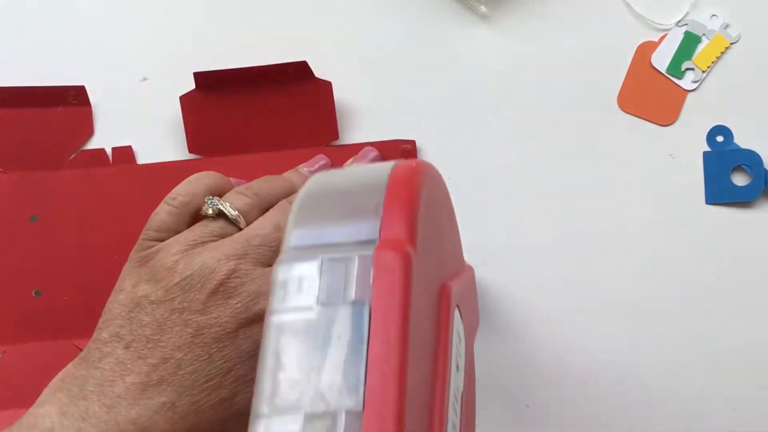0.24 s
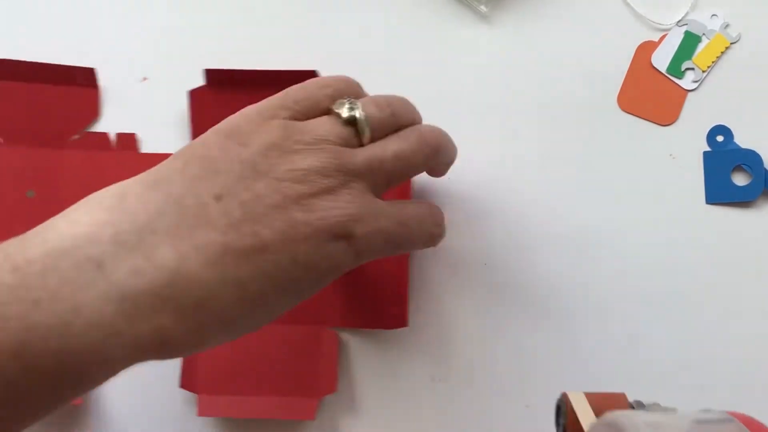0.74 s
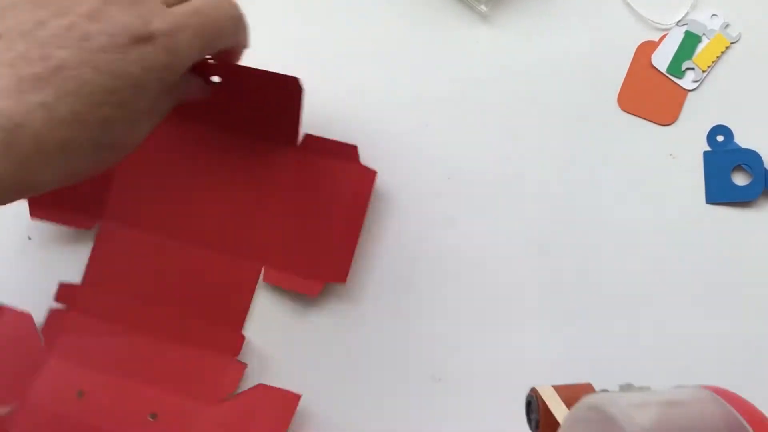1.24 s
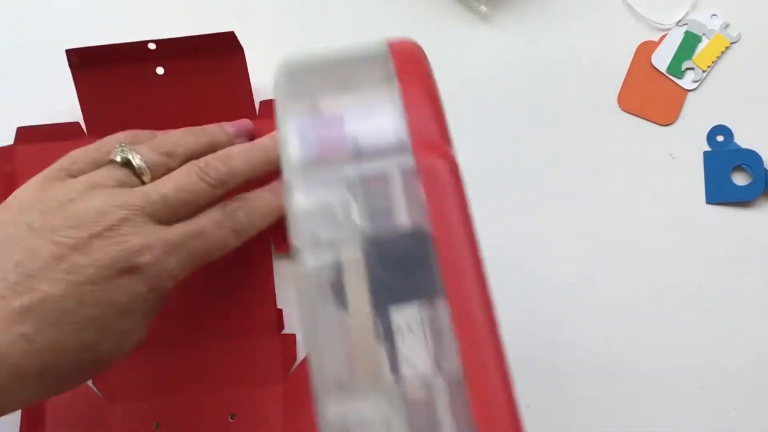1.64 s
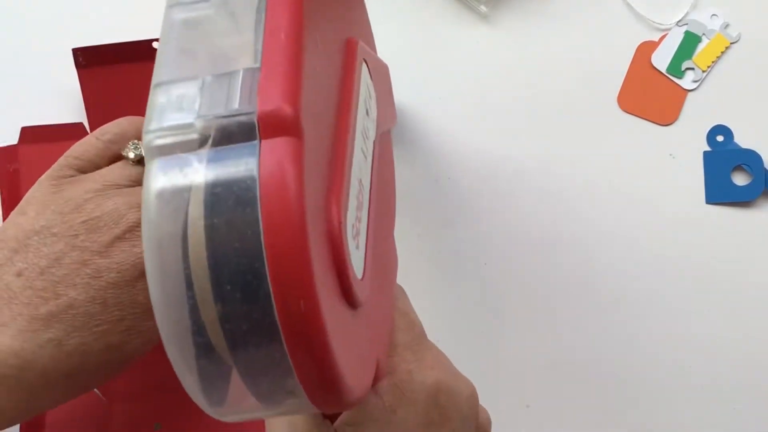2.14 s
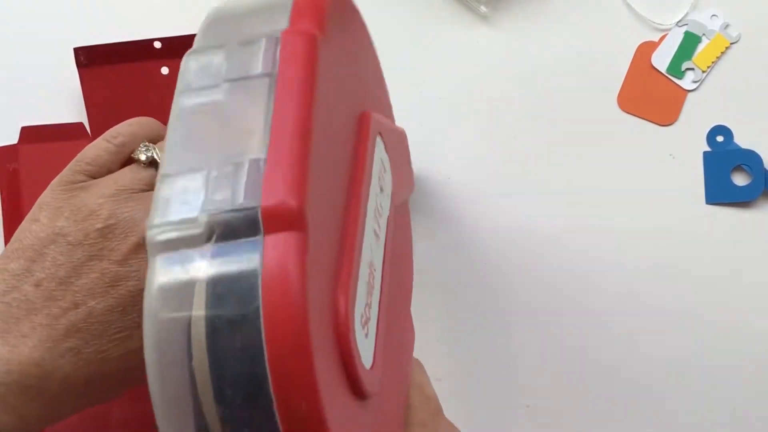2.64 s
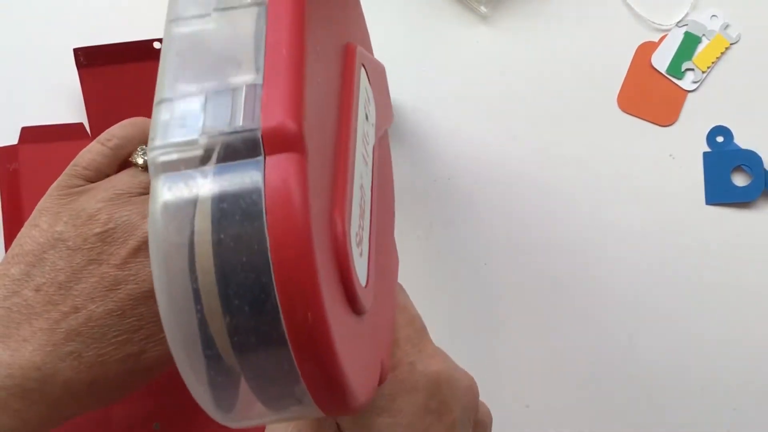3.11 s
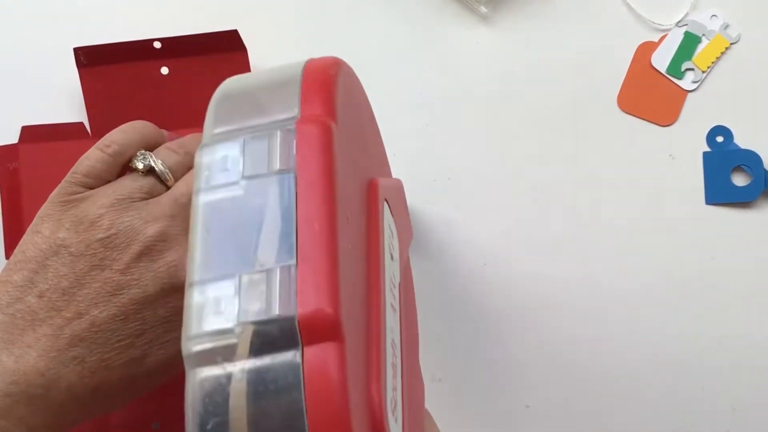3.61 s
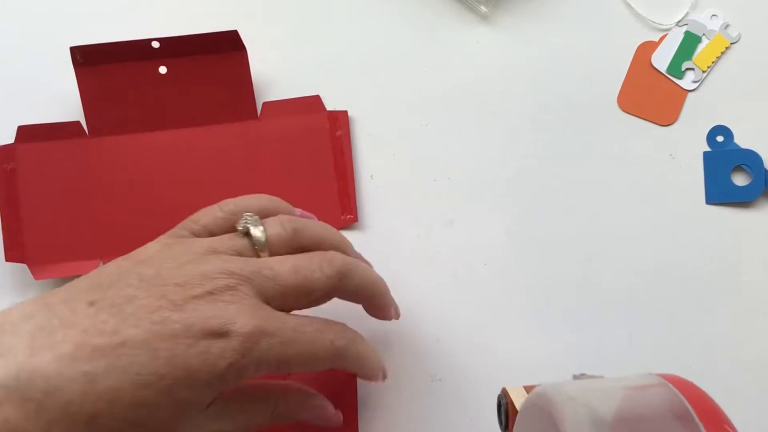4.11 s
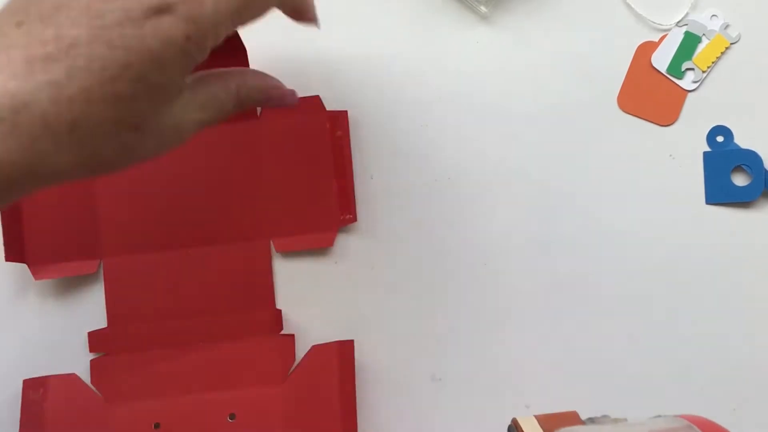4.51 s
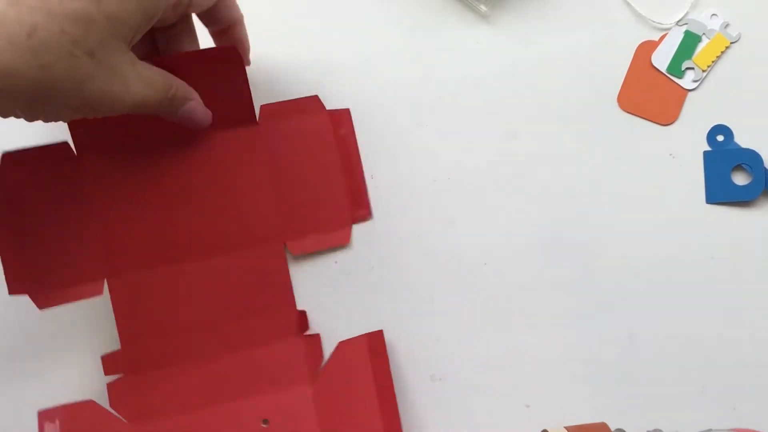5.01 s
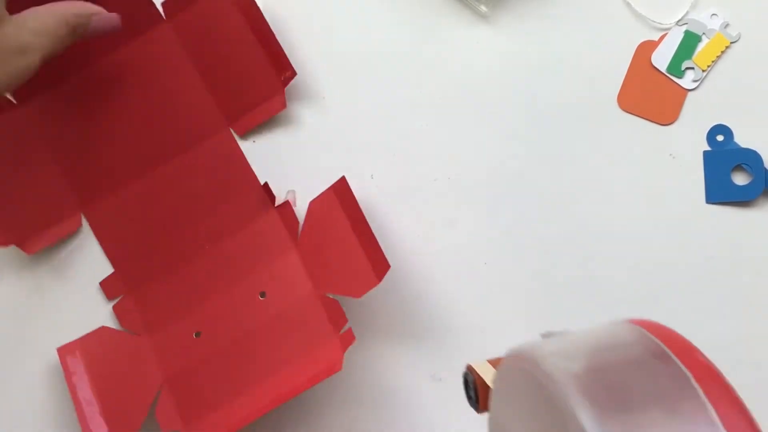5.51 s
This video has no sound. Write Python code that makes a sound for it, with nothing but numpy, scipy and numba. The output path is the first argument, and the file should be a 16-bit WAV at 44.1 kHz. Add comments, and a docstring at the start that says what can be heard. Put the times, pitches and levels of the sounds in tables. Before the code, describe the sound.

A plastic tape runner rumbles and crackles along cardstock, card scrapes and ticks between strokes, and one firm boomy knock lands midway.

```python
"""A roller rumbles and crackles first: a plastic tape runner is rolled along cardstock on a craft table.
Hands then slide and turn the card, scraping, between strokes; card and plastic tick; a firm knock booms.
Friction is noise modulated by random slips; the hollow shell and the card sheet filter it in resonant bands.
Blows excite damped modes of the table top, and a quiet room with a low hum lies under it all."""
import sys
import numpy as np
from scipy import signal
from scipy.fft import rfft, irfft
from scipy.io import wavfile
from scipy.ndimage import uniform_filter1d
from numba import njit

SR = 44100
rng = np.random.default_rng(int(sys.argv[2]) if len(sys.argv) > 2 else 0)


def generate_wav(signal):
    """Clip the signal to [-1, 1] and save it as 16-bit WAV at the path in sys.argv[1]."""
    frames = np.transpose(np.atleast_2d(signal))
    scaled = np.clip(frames, -1, 1) * 32767
    pcm = np.round(scaled).astype(np.int16)
    wavfile.write(sys.argv[1], SR, pcm)


N = 253575

# Modes of the table top: f/Hz, relative level/dB, t60/s, sign of the motion under the microphone
TABLE_MODES = [(104.2, -6, 0.21, -1), (151.8, -13.5, 0.24, 1), (207.7, -8.5, 0.045, -1),
               (231, -7, 0.051, 1), (265.4, -21.5, 0.21, 1), (345, -16.5, 0.09, -1), (418, -15, 0.13, 1),
               (532, -9.5, 0.059, -1)]
# Blows on the table: t/s, impulse level/dB, contact time/ms, upper modes against the two lowest/dB
BLOWS = [(0.254, -49, 2.9, 25.5), (0.268, -59, 2.8, 10), (0.435, -47, 4.1, 13), (.805, -44.5, 0.97, 0),
         (0.817, -45.5, 1.87, 4.5), (1.745, -39.5, 6.4, 9), (2.11, -38, 4.7, -7.5), (2.165, -42, 7.2, -24),
         (2.9853, -4.5, 2.68, -12), (3.713, -57.5, 1.75, 18.5), (4.85, -49.5, 4.6, 9),
         (5.048, -33.5, 3.7, 4)]


def undb(db):
    """Amplitude ratio of a level, by the definition of the decibel."""
    return 10 ** (np.asarray(db) / 20)


def unit(x):
    """Normalisation to an rms of 1, so that a later gain is the rms level."""
    return x / np.sqrt(np.mean(x ** 2))


@njit
def svf(x, centre_hz, width_hz):
    """Second-order resonance as two coupled integrators; the centre may move, gain 1 at the centre."""
    y = np.empty(len(x))
    band_state, low_state = 0., 0.
    for i in range(len(x)):
        g = np.tan(np.pi * centre_hz[i] / SR)
        damping = width_hz[i] / centre_hz[i]
        v = (band_state + g * (x[i] - low_state)) / (1 + g * (g + damping))
        band_state = 2 * v - band_state
        low_state = low_state + 2 * g * v
        y[i] = damping * v
    return y


def band(x, centre_hz, width_hz):
    """Resonant band-pass with a fixed or moving centre."""
    one = np.ones(len(x))
    return svf(x + 1e-18, centre_hz * one, width_hz * one)  # the offset keeps the states off denormals


def walk(rate):
    """Slow random modulation: normal values, `rate` a second, joined by straight ramps."""
    step = int(SR / rate)
    held = np.repeat(rng.standard_normal(N // step + 1), step)
    return uniform_filter1d(held, step)[:N]


def gains(strokes, index):
    """Envelope of one level column: strokes swell, hold and fade; being incoherent, their powers add."""
    swell_db = 7.5
    t = np.arange(N) / SR
    power = np.zeros(N)
    for row in strokes:
        start, rise, hold, fade_db_s = row[:4]
        late = t - start - rise
        swell = swell_db * np.minimum(late / max(rise, .003), 0)
        fade = fade_db_s * np.maximum(late - hold, 0)
        onset = np.clip((t - start) / 0.0022, 0, 1)
        power += undb(2 * (row[index] + swell - fade)) * onset
    return np.sqrt(power)


def track(strokes, index):
    """Continuous motion: one column interpolated through the middles of the holds."""
    rows = np.array(strokes)
    middle = rows[:, 0] + rows[:, 1] + rows[:, 2] / 2
    return np.interp(np.arange(N) / SR, middle, rows[:, index])


def slips(rate, scatter_db, slip_ms, smooth):
    """Stick-slip friction: decaying slips of uneven size (`rate` a second) over a steady rub."""
    hit = rng.random(N) < rate / SR
    size = undb(scatter_db * np.minimum(rng.exponential(size=N), 3))
    decay = np.exp(-1000 / (slip_ms * SR))
    fading = signal.lfilter([1], [1, -decay], hit * size)
    return unit(unit(fading) + smooth)


def air():
    """Background of the room: spectrally shaped noise, and two low hums wavering in pitch and level."""
    # spectrum of the noise: f/Hz, relative level per Hz/dB
    spectrum = np.array([(25, -26.5), (45, 4), (80, -1.5), (150, 0), (250, -6.5), (360, -5.5), (480, -14.5),
                         (900, -25), (2000, -27), (5000, -31), (12000, -38.5), (16000, -46)])
    # hums: f/Hz, drift/Hz, rms level/dB about which each wavers
    hums = [(61.7, 1.5, -72.5), (113.33, 3.48, -70.5)]
    noise_db = -68
    hz = np.fft.rfftfreq(N, 1 / SR)
    colour = undb(np.interp(np.log(hz + 1), np.log(spectrum[:, 0]), spectrum[:, 1]))
    noise = unit(irfft(rfft(rng.standard_normal(N)) * colour, N))
    out = noise * undb(noise_db + 0.12 * walk(5.2))
    for f, drift, db in hums:
        phase = 2 * np.pi * np.cumsum(f + drift * walk(4.6)) / SR
        out = out + np.sqrt(2) * undb(db + 3.0 * walk(10)) * np.sin(phase)
    return out


def room(x):
    """Diffuse reverberation: an exponentially decaying noise tail, duller than the direct sound."""
    t60_s, tail_db, damp_hz = 0.35, -12, 4900
    t = np.arange(SR // 2) / SR
    tail = rng.standard_normal(len(t)) * undb(-60 * t / t60_s) * (t > .004)
    tail = signal.lfilter(*signal.butter(1, damp_hz, fs=SR), tail)
    tail = tail / np.sqrt(np.sum(tail ** 2))
    return x + undb(tail_db) * signal.fftconvolve(x, tail)[:N]


def table(force, modes):
    """Modal superposition: the force convolved with the damped sines of the table top."""
    t = np.arange(SR // 2) / SR
    ring = np.zeros(len(t))
    for hz, db, t60, sign in modes:
        ring += np.sign(sign) * undb(db) * np.sin(2 * np.pi * hz * t) * undb(-60 * t / t60)
    return signal.fftconvolve(force, ring)[:N]


def knocks():
    """Impulsive excitation: smooth pushes drive the modes; the spot that is hit weights the upper ones."""
    low, upper = np.zeros(N), np.zeros(N)
    for s, level_db, contact_ms, upper_db in BLOWS:
        push = np.hanning(max(int(contact_ms * SR / 1000), 5))
        push = push / push.sum()
        i = int(s * SR)
        low[i:i + len(push)] += undb(level_db) * push
        upper[i:i + len(push)] += undb(level_db + upper_db) * push
    return table(low, TABLE_MODES[:2]) + table(upper, TABLE_MODES[2:])


def rattle():
    """Decaying noise: the strongest blow shakes the loose plastic parts."""
    level_db, t60_s, centre_hz = -31, 0.1, 705
    strongest = max(BLOWS, key=lambda row: row[1])
    t = np.arange(N) / SR - strongest[0]
    onset = np.clip(t / 0.0099, 0, 1)
    fading = undb(level_db - 60 * np.abs(t) / t60_s) * onset
    noise = band(rng.standard_normal(N), centre_hz, 3 * centre_hz)
    return fading * unit(band(noise, 1500, 3500))


def shell(x):
    """Parallel resonances: the hollow body of the runner colours whatever shakes it."""
    # resonances: f/Hz, width/Hz, relative level/dB
    resonances = [(480, 210, -6), (673, 79, 3), (755, 65, 4), (845, 76, 0), (1149, 183, -5.5),
                  (1480, 290, -12.5), (1900, 280, -13.5), (3150, 330, -22.5)]
    out = np.zeros(N)
    for k, (hz, width, db) in enumerate(resonances):
        out += (-1) ** k * undb(db) * band(x, hz, width)  # neighbours alternate in sign
    return out


def ticks():
    """Transients of card and plastic: a decaying ring with a broad snap, a bright edge, a tap on the shell."""
    # ticks: t/s, level of ring and snap/dB, ring f/Hz, drive level of the treble band/dB,
    # drive level of the shell before a fourfold gain/dB, t60/s
    cracks = [(0.157, -62, 1890, -49, -56, 0.098), (0.1898, -35.5, 3550, -38, -59, 0.026),
              (.2774, -48.5, 1860, -47, -50, 0.025), (0.3013, -52.5, 1900, -48, -62, 0.026),
              (0.4164, -46.5, 5530, -47, -76, 0.06), (.429, -39, 5030, -37, -43, 0.02),
              (0.5847, -57, 2310, -90, -79, 0.03), (0.6, -58, 4340, -59, -80, 0.039),
              (0.6396, -42.5, 2375, -82, -79, 0.03), (.7392, -70, 3080, -76, -66, .035),
              (0.8043, -35, 3840, -70, -37, 0.018), (1.045, -40.5, 3620, -65, -44, 0.017),
              (1.2334, -55.5, 2314, -81, -60, 0.048), (1.4432, -59.5, 3940, -79, -83, .02),
              (1.6621, -43.5, 5550, -71, -33.5, 0.036), (1.6696, -37, 2934, -82, -29, 0.017),
              (1.69, -42, 2820, -79, -34, 0.025), (2.2905, -70, 2370, -80, -46, 0.025),
              (2.379, -69, 1790, -70, -44, 0.028), (2.4347, -63, 1490, -63, -57, .022),
              (2.6318, -73, 1930, -65, -54, 0.045), (2.9817, -36.5, 1961, -72, -30, 0.072),
              (2.9918, -32.5, 2940, -71, -18, .025), (3.1685, -47.5, 1990, -53, -72, 0.029),
              (3.2262, -55, 2330, -69, -65, 0.021), (3.2447, -47.5, 1630, -61, -41.5, 0.045),
              (3.281, -57, 1610, -65, -68, 0.012), (3.3206, -45.5, 2660, -56, -38, 0.029),
              (3.3373, -44.5, 1730, -66, -30.5, 0.019), (3.4446, -57, 1670, -61, -33, 0.049),
              (3.495, -48, 1980, -39, -54, 0.02), (3.5239, -55, 1944, -57, -54, 0.085),
              (3.6017, -64, 2230, -80, -51, 0.023), (3.7012, -44.5, 5710, -39, -51, 0.07),
              (3.7154, -46, 1450, -72, -44, 0.03), (3.912, -62.5, 3080, -61.5, -89, 0.028),
              (3.9984, -77, 1520, -93, -59, 0.029), (4.25, -51, 4120, -60, -74, 0.0091),
              (4.3156, -50.5, 2670, -67, -72, 0.012), (4.364, -44.5, 3440, -44.5, -78, 0.018),
              (4.748, -70, 3470, -61, -82, .015), (4.825, -51, 2480, -72, -70, .01),
              (4.8449, -44.5, 1946, -62, -76, 0.029), (4.8498, -79, 2320, -41, -49, 0.034),
              (4.9531, -55.5, 4380, -67, -74, 0.0085), (5.026, -36, 4030, -32.5, -46, 0.034),
              (5.0394, -33, 1953, -72, -79, 0.038), (5.0465, -26, 3357, -66, -26.5, 0.017),
              (5.0899, -40, 1910, -48, -70, 0.021), (5.1158, -47, 2020, -68, -40, 0.014),
              (5.163, -47.5, 3980, -43.5, -80, 0.023)]
    ring_share = 0.42  # the rest is snap
    out, bright, tap = np.zeros(N), np.zeros(N), np.zeros(N)
    t = np.arange(SR // 8) / SR
    for s, level_db, hz, treble_db, shell_db, t60 in cracks:
        noise = rng.standard_normal(len(t))
        fall = t / t60
        shape = undb(-60 * fall) * np.minimum(fall / 0.15, 1)
        crack = noise * shape
        rough_phase = np.cumsum(noise) * np.sqrt(hz / SR)  # roughens the pitch
        ring = shape * np.sin(2 * np.pi * hz * t + rough_phase)
        snap = band(band(crack, 2930, 4500), 2930, 4500)
        mix = ring_share * ring / shape.max() + (1 - ring_share) * snap / np.abs(snap).max()
        i = int(s * SR)
        out[i:i + len(t)] += undb(level_db) * mix
        bright[i:i + len(t)] += undb(treble_db) * crack
        tap[i:i + len(t)] += undb(shell_db) * crack
    edge = band(band(bright, 10000, 14000), 10000, 14000)
    return out + edge + 4 * shell(tap)


def card():
    """Sliding friction: fibres scrape the table; bands of the bending sheet sound most near the scrape."""
    # slides: t/s, rise/s, hold/s, fade/(dB/s), scrape level/dB, treble level/dB, scrape centre f/Hz
    slides = [(.645, 0.0062, .05, 250, -72.5, -77.5, 2320), (.74, 0.028, 0.046, 125, -60, -70, 3470),
              (.9, 0.021, 0.095, 194, -67, -72, 2960), (1.04, 0.0041, 0.076, 600, -62.5, -72, 2920),
              (1.18, 0.064, .02, 200, -69, -73.5, 2600), (1.26, 0.031, 0.088, 326, -62, -70.5, 3320),
              (2.925, 0.0089, .04, 300, -77, -89, 2920), (3.875, .01, 0.053, 500, -82.5, -81, 3120),
              (4.24, .04, 0.018, 404, -69, -79, 3050), (4.33, 0.01, 0.014, 155, -74, -73, 3380),
              (4.74, 0.013, 0.12, 200, -77.5, -78.5, 3080), (4.85, 0.0076, 0.088, 202, -72.5, -79, 2800),
              (5.005, 0.04, 0.048, 352, -65.5, -63, 2950), (5.19, 0.057, 0.0087, 299, -71, -72, 3340),
              (5.275, 0.058, 0.065, 300, -57.5, -67.5, 3070), (5.44, 0.017, 0.054, 406, -66, -79.5, 2550)]
    # bending bands of the sheet: f/Hz, width/Hz, relative level/dB
    sheet = [(2220, 1400, 1.5), (3210, 410, -8.5), (4260, 1400, -1), (5030, 1300, 0), (5900, 1100, -18)]
    centre = track(slides, index=6)
    rub = undb(2 * walk(70)) * slips(500, scatter_db=7, slip_ms=1.0, smooth=2.25)
    narrow = band(rub * rng.standard_normal(N), centre, 0.15 * centre)
    scrape = 0.7 * unit(band(narrow, centre, 0.5 * centre))
    for hz, width, db in sheet:
        near_db = -9 * np.abs(np.log2(hz / centre))  # 9 dB lost per octave from the centre
        patchy_db = 3 * walk(30)
        fibres = rub * rng.standard_normal(N)
        bending = unit(band(band(fibres, hz, width), hz, 3 * width))
        scrape = scrape + undb(db + near_db + patchy_db) * bending
    treble = band(band(rub * rng.standard_normal(N), 6200, 16000), 6200, 16000)
    return gains(slides, index=4) * unit(scrape) + gains(slides, index=5) * unit(treble)


def roller():
    """Rolling friction: judder drives shell and tape through the air; rumble goes through the table modes."""
    # strokes: t/s, rise/s, hold/s, fade/(dB/s), shell level/dB, tape crackle level/dB, drag level/dB
    strokes = [(0.0, 0.0041, 0.064, 200, -66, -68, -67.5), (.09, 0.053, 0.11, 350, -55, -66.5, -60),
               (.4, 0.023, 0.023, 294, -66, -66, -64), (2.28, 0.016, 0.23, 210, -71.5, -91, -72.5),
               (3.16, 0.031, 0.09, 250, -67.5, -72.5, -64.5), (3.32, 0.017, 0.19, 300, -60, -68.5, -64),
               (3.54, 0.015, 0.041, 398, -72, -95, -82), (3.66, 0.033, 0.013, 179, -66.5, -69.5, -71)]
    # table rumble while the runner bears down: t/s, rise/s, hold/s, fade/(dB/s), level/dB
    bearing = [(0.0, 0.094, 0.091, 298, -47), (.23, 0.015, 0.075, 398, -49), (2.34, 0.037, 0.14, 124, -58),
               (3.19, 0.013, 0.075, 200, -52), (3.335, 0.014, 0.079, 108, -42.5),
               (3.6, 0.013, 0.016, 300, -65)]
    # groan of the shell on one note as the roller slows: t/s, rise/s, hold/s, fade/(dB/s), level/dB
    groans = [(2.33, .04, 0.18, 103, -76.5), (3.35, 0.018, 0.051, 202, -68),
              (3.55, 0.0098, 0.029, 250, -60.5), (3.99, 0.0074, 0.0091, 400, -74.5)]
    groan_hz, groan_width_hz = 665, 40

    judder = slips(70, scatter_db=3, slip_ms=4, smooth=.9)
    body = unit(shell((judder + 0.77) * rng.standard_normal(N)))
    crackle = slips(600, scatter_db=4, slip_ms=.7, smooth=.8)
    tape = unit(band(judder * crackle * rng.standard_normal(N), 1500, 7600))
    drag = unit(band(band(judder * rng.standard_normal(N), 670, 2200), 940, 4000))
    groan = unit(band(rng.standard_normal(N), groan_hz, groan_width_hz))

    rolling = gains(strokes, index=4) * body
    rolling += gains(strokes, index=5) * tape
    rolling += gains(strokes, index=6) * drag
    rolling += gains(groans, index=4) * groan

    force = band(undb(3.9 * walk(15)) * rng.standard_normal(N), 70, 100)
    rumble = table(force, TABLE_MODES)
    # levelled over 1/16 s, so that the hand's pressure alone sets the strength
    rumble = rumble / np.sqrt(uniform_filter1d(rumble ** 2, SR // 16))
    return rolling, gains(bearing, index=4) * rumble


def scene():
    """Superposition at one microphone; the table's boom comes through the stand, without the room tail."""
    rolling, rumble = roller()
    airborne = room(rolling + card() + ticks() + rattle())
    return (airborne + rumble + knocks() + air())[None]


def record(dry):
    """Band limitation: the microphone drops the deep bass; the recorder cuts the top."""
    bass_cut_hz, top_hz = 72, 15800
    thin = signal.sosfilt(signal.butter(3, bass_cut_hz, "high", fs=SR, output="sos"), dry)
    return signal.sosfilt(signal.ellip(10, .2, 70, top_hz, fs=SR, output="sos"), thin)


dry = scene()
out = record(dry)
generate_wav(out)
```